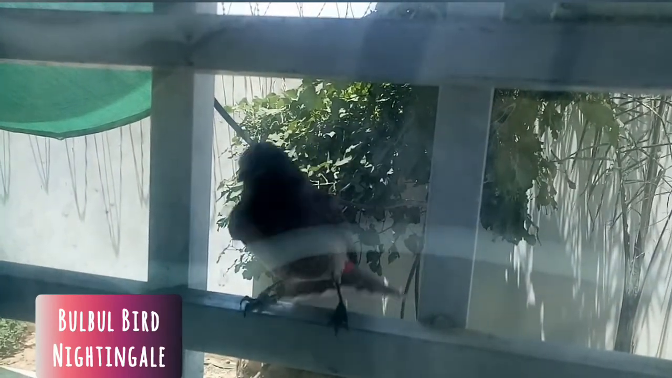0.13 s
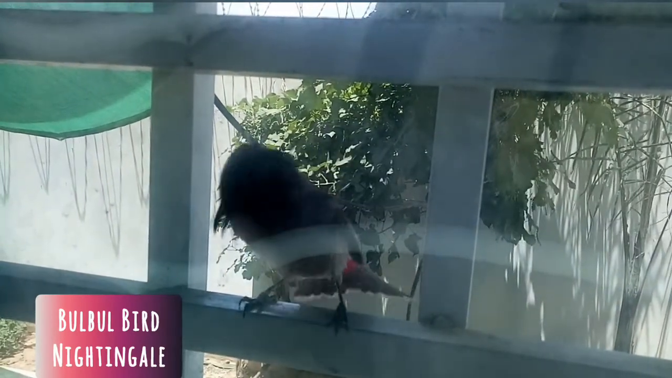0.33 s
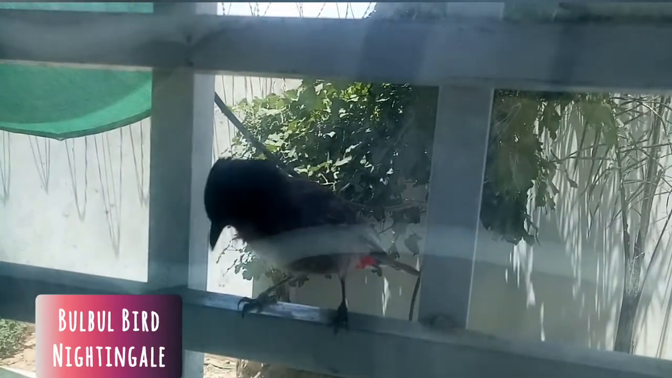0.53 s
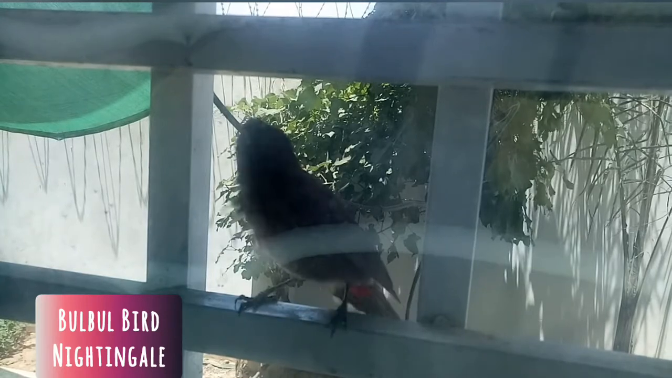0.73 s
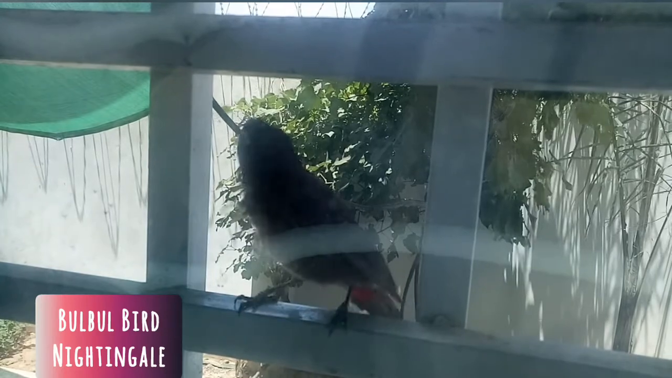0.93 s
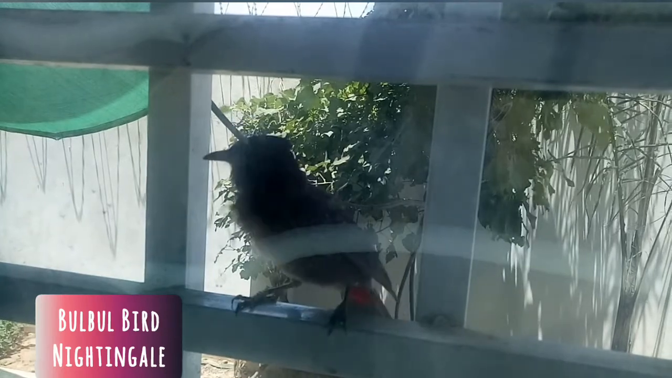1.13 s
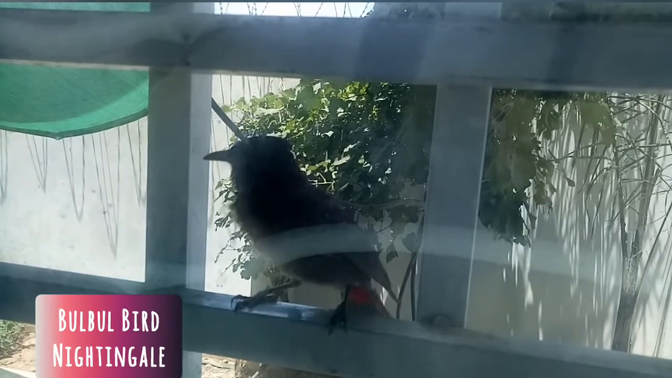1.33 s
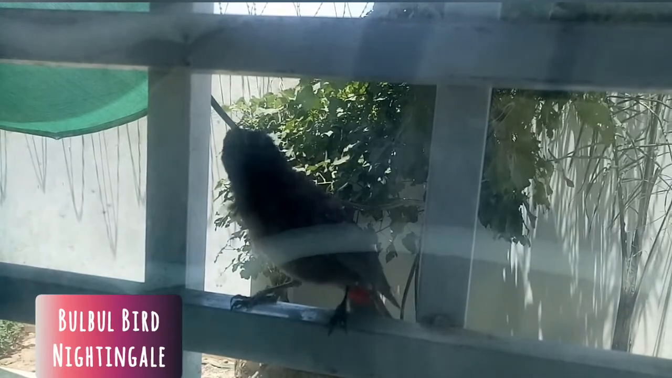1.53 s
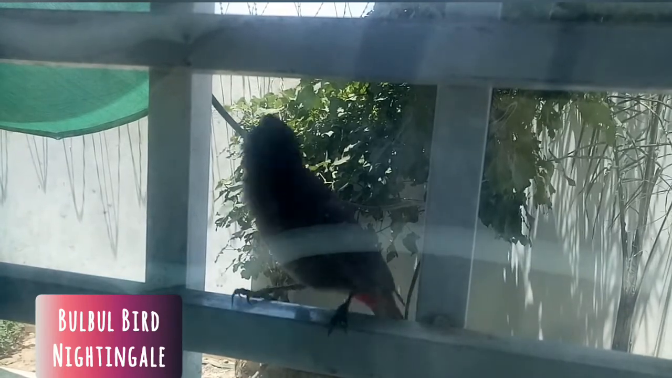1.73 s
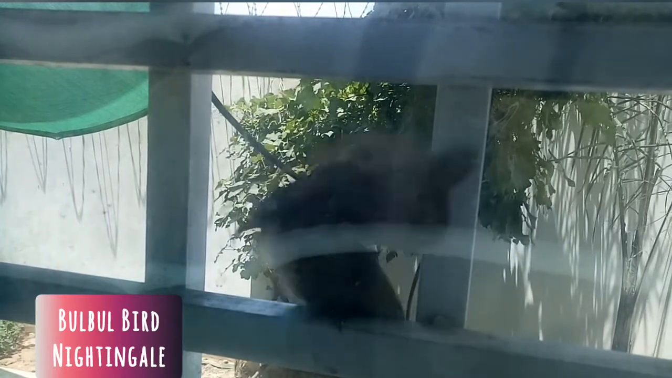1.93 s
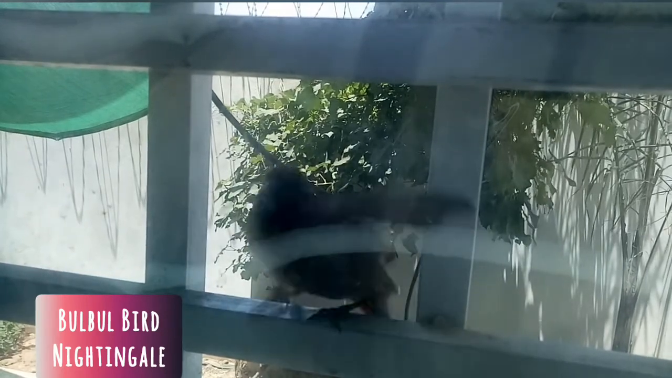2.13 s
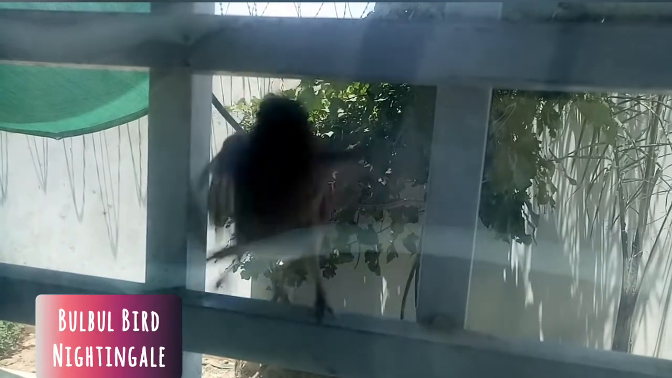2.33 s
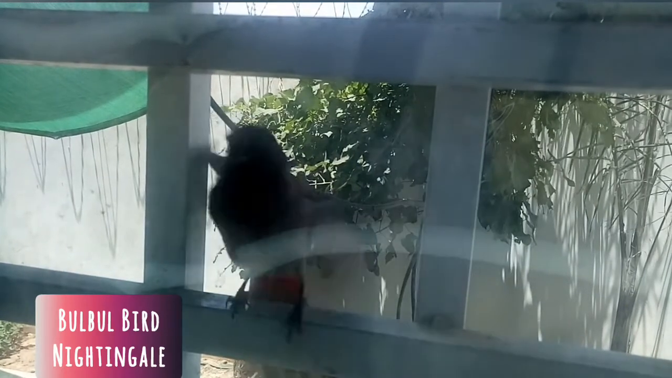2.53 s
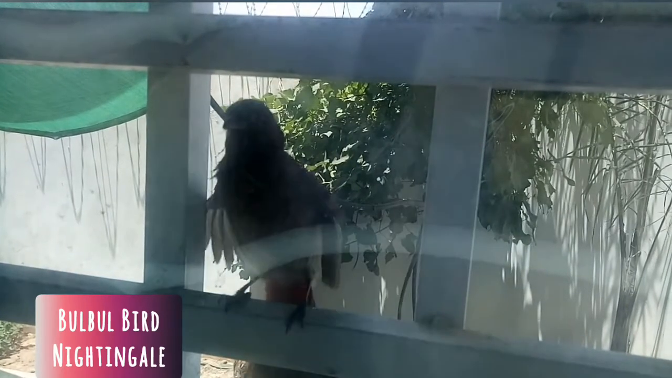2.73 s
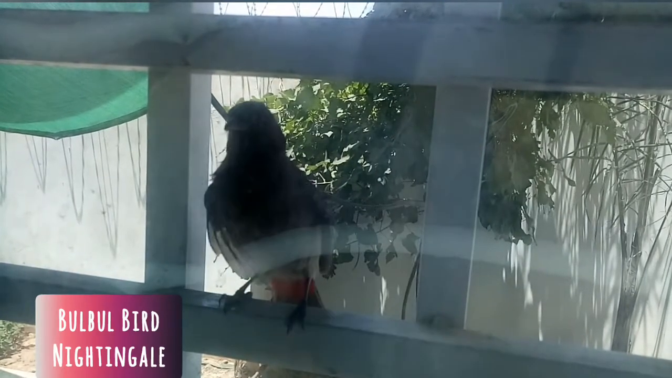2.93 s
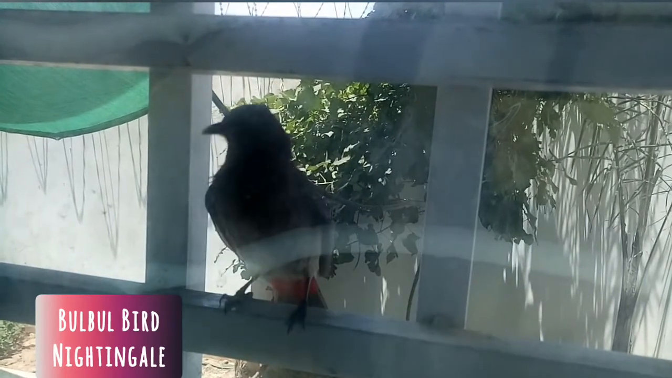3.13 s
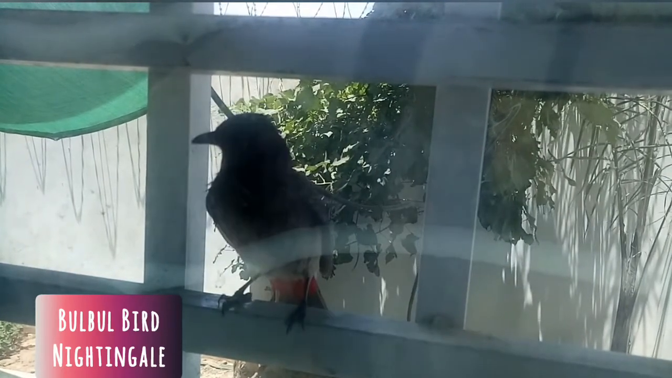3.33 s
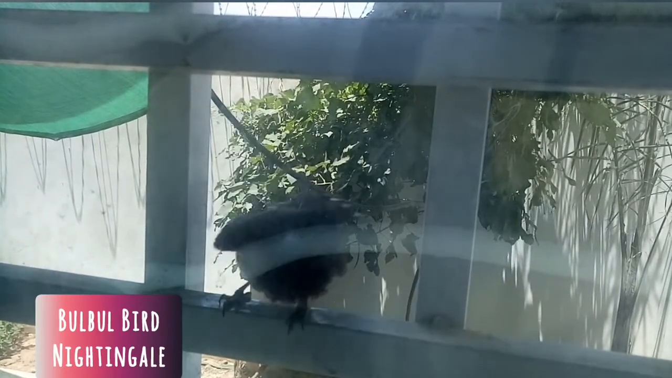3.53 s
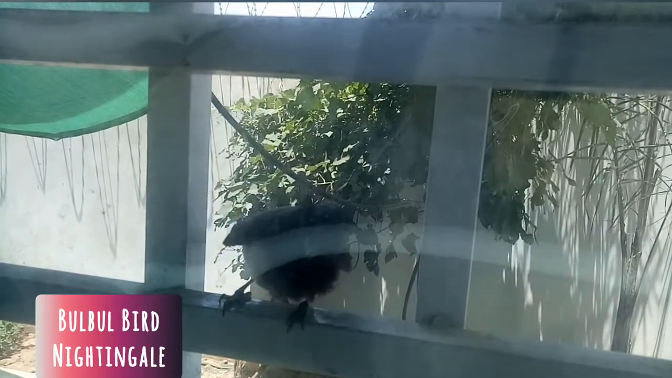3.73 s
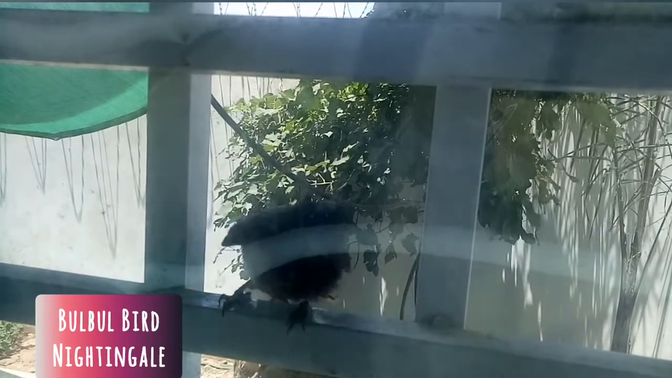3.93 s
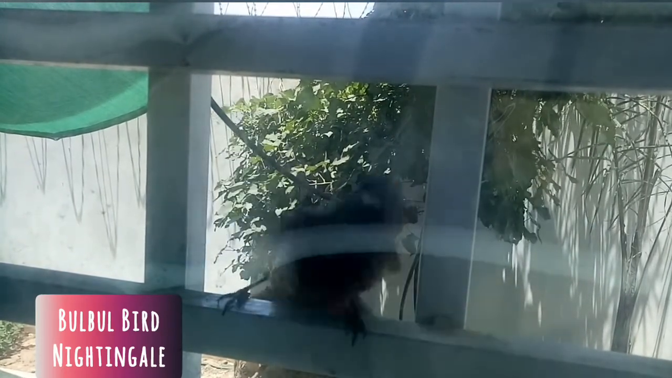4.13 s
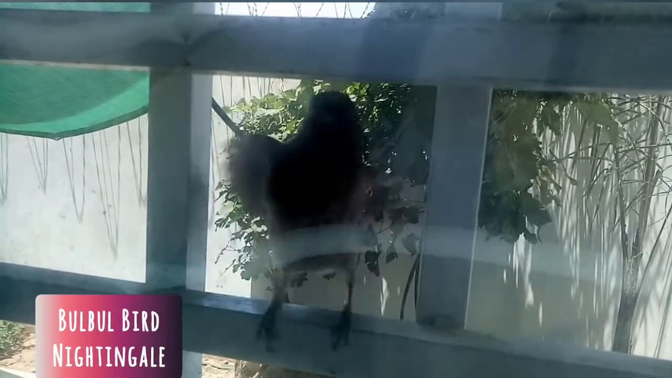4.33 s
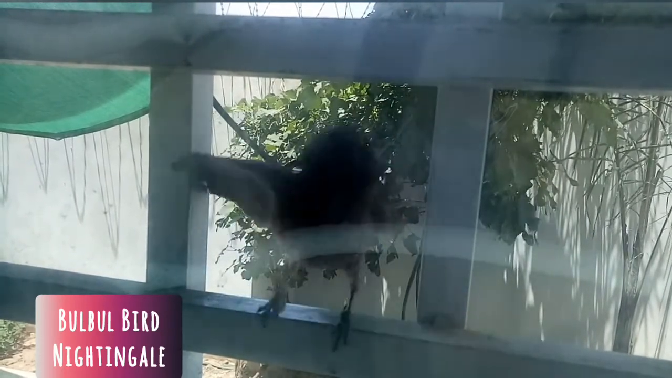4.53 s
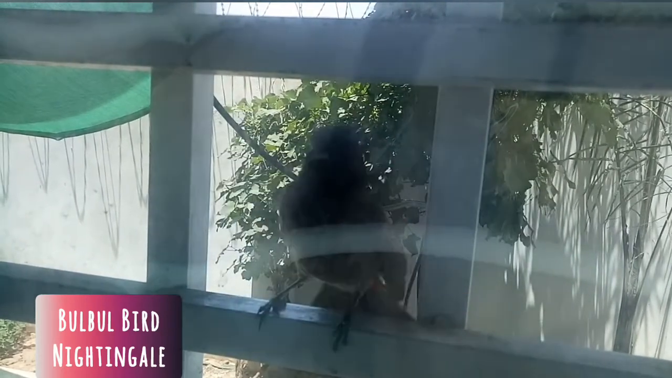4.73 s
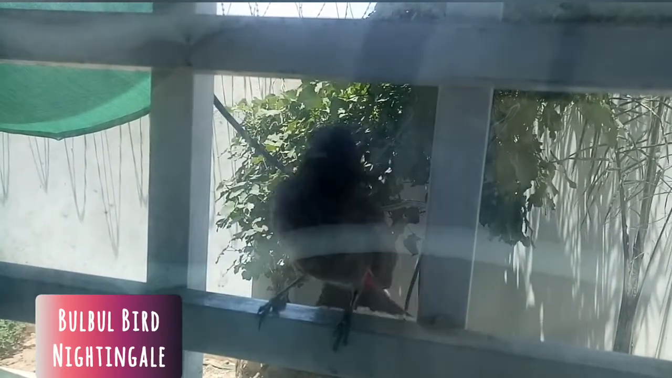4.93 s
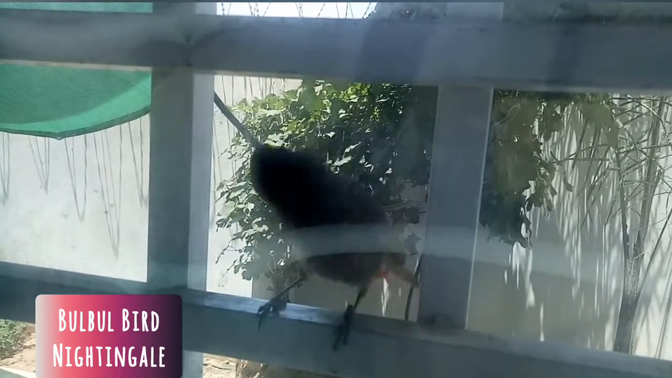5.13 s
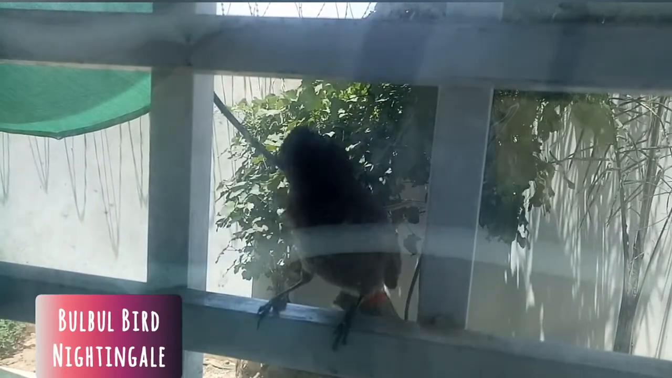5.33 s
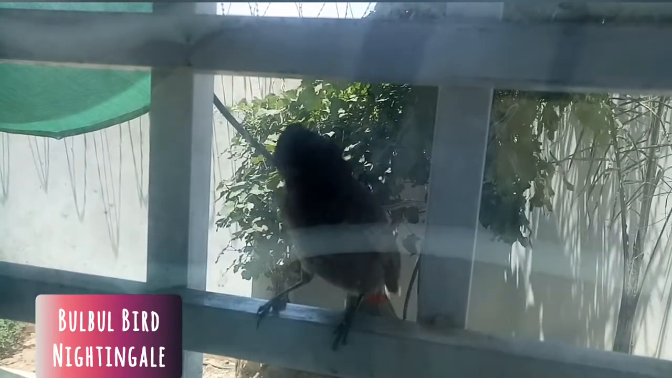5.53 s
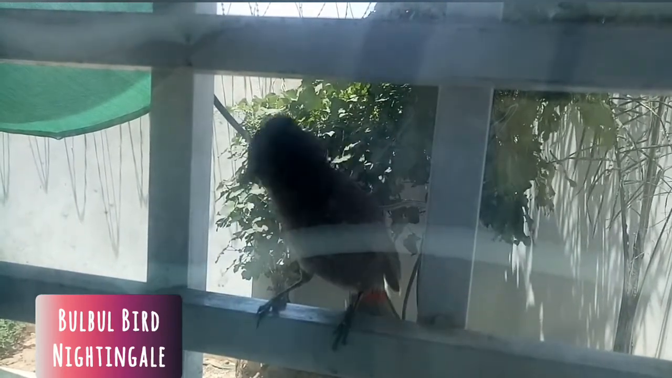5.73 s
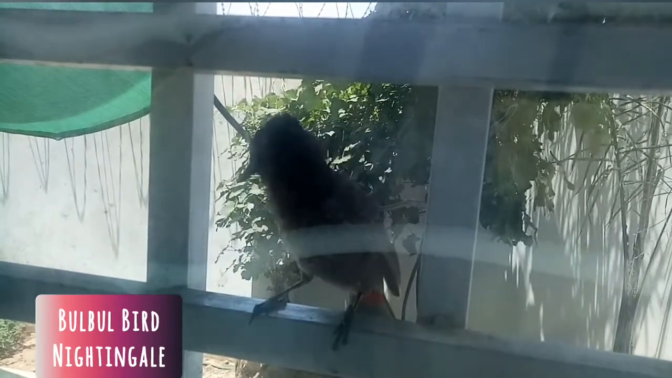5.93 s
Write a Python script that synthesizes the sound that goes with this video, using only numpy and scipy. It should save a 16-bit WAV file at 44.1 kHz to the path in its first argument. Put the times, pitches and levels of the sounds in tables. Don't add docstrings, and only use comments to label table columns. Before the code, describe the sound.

Close to a window indoors: yard birds chip, buzz and whistle over a low, fluttering motor hum. Sharp beak knocks then burst on the glass, crisp and briefly ringing, with a light wing rustle and a short room echo. Later come small claw ticks and another softer set of knocks. The drone slowly rises in pitch, fading in and out beneath slight hiss, the left channel muffled.

```python
import sys
import numpy as np
from scipy import signal
from scipy.fft import rfft, irfft
from scipy.io import wavfile
from scipy.ndimage import uniform_filter1d

SR = 44100
rng = np.random.default_rng(int(sys.argv[2]) if len(sys.argv) > 2 else 0)


def transcribe(signal):
    frames = np.atleast_2d(signal).T
    limited = np.clip(frames, -1, 1)
    pcm = np.round(limited * 32767).astype(np.int16)
    wavfile.write(sys.argv[1], SR, pcm)


def gain_from_db(level_db):
    decades = np.asarray(level_db, float) / 20
    return 10 ** decades


N = 268172

# pitch_hz, level_db, t60_s (seconds to fade by 60 dB)
GLASS_TONES = [(1942, -8, 0.053), (2355, -7.5, 0.077), (2790, -22, 0.0731), (3293, -23.5, 0.016),
               (3987, -6, 0.013), (4118, -22.5, 0.11), (4520, -32, 0.2), (4920, 1.5, 0.012),
               (5800, -24, 0.021), (6100, -37, 0.34), (6315, -35.5, 0.16), (7030, -4.5, 0.072)]


def evened(x):
    return x / np.sqrt(np.mean(x ** 2) + 1e-20)


def smoothed_twice(x, first, second):
    return evened(uniform_filter1d(uniform_filter1d(x, first), second))


def read(points, hz):
    table_hz, value = np.transpose(points)
    return np.interp(np.log(hz + 1), np.log(table_hz + 1), value)


def add(mix, start_s, sound):
    part = mix[round(start_s * SR):][:len(sound)]
    part += sound[:len(part)]


def coloured(x, points):
    size = x.shape[-1]
    gain = gain_from_db(read(points, np.fft.rfftfreq(size, 1 / SR)))
    return irfft(rfft(x) * gain, size)


def causal(points):
    hz = abs(np.fft.fftfreq(2048, 1 / SR))
    log_gain = np.log(gain_from_db(read(points, hz)))
    return np.fft.ifft(np.exp(np.conj(signal.hilbert(log_gain)))).real[:1024]


def ring(modes, chance, spread_db):
    t = np.arange(SR // 3) / SR
    total = np.zeros(len(t))
    for (hz, db, t60), luck in zip(modes, chance):
        total += gain_from_db(db + spread_db * luck - 60 * t / t60) * np.sin(2 * np.pi * hz * t)
    return total


def tails(t60_of, gap_s):
    taps = np.zeros((2, SR))
    start = np.arange(round(gap_s * SR), SR - 20, 20)
    at = start + rng.integers(0, 20, (2, len(start)))
    np.put_along_axis(taps, at, rng.choice([-1., 1.], (2, len(start))), 1)
    hz, t, z = signal.stft(taps, SR, nperseg=256)
    fade_db = -60 * t / read(t60_of, hz)[:, None]
    tail = signal.istft(z * gain_from_db(fade_db), SR, nperseg=256)[1]
    return tail / np.linalg.norm(tail[0])


def arch(length_s, peak_at, start_db, end_db):
    u = np.arange(round(length_s * SR)) / (length_s * SR)
    level_db = np.interp(u, [0, np.clip(peak_at, .02, .98), 1], [start_db, 0, end_db])
    return u, signal.windows.tukey(len(u), .15) * gain_from_db(level_db)


def peck(start_s, db, thud_db, bright_hz, breadth):
    # pitch_hz, level_db (per Hz)
    crack_colour = [(150, -23.5), (500, -0.5), (1200, 0), (2300, -6), (4000, -4.5), (5200, -8.5),
                    (6500, -20), (8000, -44.5), (15000, -63)]
    # pitch_hz, level_db, t60_s
    bending = [(109.14, -21.5, 0.15), (269, 0, 0.055), (369.5, 2.5, 0.029), (538.6, 2, 0.022)]
    noise = rng.standard_normal(1024)
    chance = rng.standard_normal((2, 30))
    t = np.arange(1024) / SR
    contact = (1 - np.exp(-t / .002)) * np.exp(-t / .0028)

    breadth = max(breadth, 1.05)
    bump = [(bright_hz / breadth ** 2, -30), (bright_hz / breadth, -9), (bright_hz, 0), (bright_hz * breadth, -9)]
    colour = np.convolve(causal(crack_colour), causal(bump))[:1024]
    crack = np.convolve(noise * contact, colour)
    crack = gain_from_db(db + 9.5) * crack / abs(crack).max()

    blow = colour * np.linalg.norm(crack) / np.linalg.norm(colour)
    glass = np.convolve(blow, ring(GLASS_TONES, chance[0], spread_db=2.0))

    high_pass = signal.butter(N=2, Wn=85, btype="high", fs=SR)
    thud = -signal.lfilter(*high_pass, ring(bending, chance[1], spread_db=2.5))
    thud = np.roll(thud / abs(thud).max(), 25)
    thud[:1024] -= .5 * np.exp(-((t - .0017) / 0.0003) ** 2)
    thud = gain_from_db(db + thud_db + 11) * thud

    direct, spread = np.zeros((2, SR // 2))
    for part in (crack, gain_from_db(-28.0) * glass, thud):
        add(direct, 0, part)
    add(spread, 0, blow)
    add(spread, 0, gain_from_db(3.5) * thud)
    return start_s - .0015, direct, spread


def beak():
    # start_s, level_db
    clicks = [
        (2.2654, -52),
        (2.3363, -80),
        (2.379, -79),
        (2.4195, -67),
        (4.2483, -66),
    ]
    # pitch_hz, level_db (per Hz)
    click_colour = [(6500, -42), (8000, -1), (13500, -5), (14800, -31.5)]
    out = np.zeros(N)
    t = np.arange(1024) / SR
    swell = (1 - np.exp(-t / .001)) * np.exp(-t / .0044)
    for start_s, db in clicks:
        tick = evened(coloured(rng.standard_normal(1024), click_colour)) * swell
        add(out, start_s - .0015, gain_from_db(db) * tick)
    return out


def claws():
    # start_s, level_db
    scrapes = [
        (3.5622, -44),
        (4.0558, -51.5),
        (4.4414, -58),
    ]
    # pitch_hz, level_db, t60_s
    frame_tones = [
        [(650, -13, .008), (1250, 0, .012), (1600, -2, .008), (1950, 3, .012), (2400, 1, .008), (3100, 0, .006),
         (4750, 5, .014)],
        [(2550, -4, .022), (3200, -1, .022), (3600, -4, .012), (4150, 3, .018), (4800, 8, .015), (5400, 6, .01)],
        [(1300, -3, .015), (1750, -2, .015), (2150, -3, .015), (4100, 5, .02)],
    ]
    out = np.zeros(N)
    for (start_s, db), modes in zip(scrapes, frame_tones):
        tap = np.convolve(np.hanning(14), ring(modes, np.zeros(len(modes)), spread_db=0))
        tap /= abs(tap).max()
        for late_s, slip_db in ((0, -2), (.0031, 3), (.0074, -8.5)):
            add(out, start_s - .002 + late_s, gain_from_db(db + 7.5 + slip_db) * tap)
    return out


def wings():
    # start_s, length_s, level_db (loudest)
    brushes = [
        (2.34, .05, -67),
        (2.385, 0.044, -60.5),
        (4.332, 0.116, -69),
    ]
    # pitch_hz, level_db
    feather_colour = [(300, -8), (1000, 2.5), (3000, -7.5), (6000, 13.5), (9000, -15), (13000, -8.5),
                      (14500, -9.5), (16000, -24)]
    out = np.zeros(N)
    for start_s, length_s, db in brushes:
        gain = arch(length_s, .6, -11.5, -8)[1]
        noise, strokes = rng.standard_normal((2, SR // 4))
        strokes = gain_from_db(3 * evened(uniform_filter1d(strokes, 150)))
        rustle = coloured(noise, feather_colour) * strokes
        add(out, start_s, rustle[:len(gain)] * gain_from_db(db) * gain)
    return out


def room_echo(send):
    # pitch_hz, t60_s
    echo_times = [(100, 0.51), (300, 0.52), (600, 0.48), (1200, 0.36), (3000, 0.54), (4700, 0.56),
                  (6500, 0.35), (10000, 0.44)]
    left, right = signal.fftconvolve(send[None], tails(echo_times, 0.0043), axes=1)[:, :N]
    shared_bass = coloured(right - left, [(350, 0), (900, -30)])
    return np.array([left + shared_bass, right])


def through_pane(x):
    modes = [(hz, db / 3, min(t60, .04)) for hz, db, t60 in GLASS_TONES]
    glass = ring(modes, np.zeros(len(modes)), spread_db=0)
    return x + gain_from_db(-39) * signal.fftconvolve(x, glass[None], axes=1)[:, :N]


def yard_birds():
    # start_s, length_s, level_db (loudest), first_pitch_hz, last_pitch_hz
    whistles = [(.171, 0.11, -69, 3890, 3851), (.381, 0.14, -69.5, 2350, 2357),
                (.541, 0.13, -60.5, 2000, 2010), (.501, 0.11, -63.5, 2710, 2670),
                (1.021, 0.19, -56.5, 2361, 2170), (1.321, 0.2, -57.5, 2230, 2199),
                (1.311, .12, -67, 1833, 1851), (1.511, 0.2, -58.5, 2187, 2171),
                (1.781, .31, -72.5, 4601, 4580), (2.035, .12, -70, 4100, 4050),
                (3.111, 0.11, -71.5, 4945, 4931), (3.401, 0.17, -73.5, 3940, 4050),
                (3.575, .21, -63, 3366, 3245), (3.841, .2, -79.5, 4401, 4390),
                (4.501, 0.19, -65, 5421, 5260), (5.211, .05, -72, 1290, 1301),
                (5.19, 0.21, -74.5, 4376, 4383), (5.39, 0.25, -78.5, 5290, 5290),
                (5.73, .14, -80, 4380, 4380), (6.0, .2, -65, 4438, 4550)]
    chips = [
        (.49, 0.082, -52, 3282, 3384),
        (.995, .07, -44.5, 4020, 3927),
        (1.485, 0.048, -43, 2266, 2184),
        (4.492, 0.018, -40.5, 5510, 5420),
    ]
    churrs = [(.18, 0.42, -71.5, 4420, 4520), (.4, 0.21, -68, 3800, 3420), (.49, 0.13, -68, 3164, 3250),
              (.5, 0.085, -73, 2170, 1943), (.88, .32, -70.5, 4350, 4370), (.94, 0.24, -67, 3050, 3245),
              (1.03, .17, -64, 3660, 3530), (1.1, 0.16, -73, 2800, 2605), (1.3, .2, -69.5, 4420, 4310),
              (1.32, .23, -56, 3814, 3240), (1.41, 0.16, -60.5, 2690, 2790),
              (1.54, 0.141, -61.5, 3540, 3660), (3.15, .19, -67, 4670, 4537), (3.35, 0.25, -67, 4552, 4620),
              (3.38, 0.096, -67.5, 4900, 5220), (3.63, 0.14, -67.5, 3766, 3810),
              (4.39, 0.19, -64, 4100, 4050), (5.34, .13, -76.5, 4590, 4450), (2.5, .11, -71, 4010, 3900),
              (2.84, 0.19, -73.5, 4510, 4458)]
    sweeps = [
        (1.395, .095, -50.5, 3560, 2187),
    ]
    shrieks = [
        (.935, 0.2, -56, 4544, 3480),
        (1.33, 0.11, -64, 4020, 3650),
    ]
    # loudest place (0-1), start_db, end_db, buzz_hz
    kinds = [(whistles, (0.18, -8, -20, 59.5)), (chips, (0.06, -4, -17.5, 87)),
             (churrs, (0.73, -2, -29.5, 167.5)), (sweeps, (0, -14, -5, 121)), (shrieks, (.3, -9, -15, 600))]
    flutter_db = 3.5
    out = np.zeros(N)
    for notes, (*shape, buzz_hz) in kinds:
        for start_s, length_s, db, first_hz, last_hz in notes:
            u, gain = arch(length_s, *shape)
            buzz = smoothed_twice(rng.standard_normal(SR // 2), 50, 50)[:len(u)]
            hz = first_hz + (last_hz - first_hz) * u + buzz_hz * buzz
            flutter = smoothed_twice(rng.standard_normal(SR // 2), 700, 500)[:len(u)]
            tone = np.sin(2 * np.pi * np.cumsum(hz) / SR)
            add(out, start_s, gain_from_db(db + flutter_db * flutter - 1) * gain * tone)
    leaves = tails([(1000, 0.087), (6000, 0.086)], 0.000989)
    walls = tails([(1500, 0.49), (6000, 0.25)], .02)
    blurred = signal.fftconvolve(out[None], .62 * leaves + .3 * walls, axes=1)[:, :N]
    return blurred + 0.6 * out


def engine_tones(t, cycle_hz, fifth_db, fourth_db, fade_db):
    turn = 2 * np.pi * np.cumsum(cycle_hz) / SR
    waver = sum(np.sin(2 * np.pi * (f * t + rng.random())) for f in np.geomspace(1.1, 6.3, num=9))
    waver = evened(waver)
    room_fade_db = .6 * fade_db
    tones = [(4 * turn, fourth_db + .25 * fade_db),
             (5 * turn, fifth_db + fade_db),
             (2 * np.pi * 158 * t, fourth_db + room_fade_db - 4 + 4 * waver)]
    total = np.zeros(N)
    for angle, db in tones:
        total += np.sqrt(2) * gain_from_db(db) * np.sin(angle + 2 * np.pi * rng.random())
    hum_db = -71 + room_fade_db + 2 * waver[::-1]
    return total + gain_from_db(hum_db) * np.sin(2 * np.pi * 74.8 * t)


def engine_noise(t, load_db):
    # pitch_hz, level_db (per Hz)
    rumble_colour = [(12, -53), (20, -23.5), (70, -9), (113, -1.5), (139, -3.5), (159, -7.5), (199, -11),
                     (232, -18), (536, -39), (1200, -51.5), (1560, -80.5), (2640, -120)]
    boom_colour = [(200, -27), (290, 6), (340, 3), (450, -16), (700, -46.5)]
    a, b, c, d = rng.standard_normal((4, N))
    rumble = evened(coloured(np.array([a + 0.1 * b, a - 0.12 * b]), rumble_colour))
    boom = evened(coloured(np.array([c + 0.96 * d, c - 0.4026 * d]), boom_colour))
    swell_db = 9 * np.exp(-((t - 4.15) / .6) ** 2)
    return rumble * gain_from_db(0.54 * load_db - 62), boom * gain_from_db(0.296 * load_db - 71.5 + swell_db)


def engine():
    # start_s, cycle_rate_hz, fifth_level_db, fourth_level_db (tones at 5 and 4 times the rate)
    running = [(0.0, 27.27, -60, -74), (.1, 27.3, -51.5, -52), (.24, 26.96, -69, -58.5),
               (.45, 25.86, -45.5, -63.5), (.78, 26.01, -51, -58.5), (.92, 27, -48.5, -58.5),
               (1.4, 27.2, -47.5, -57.5), (1.78, 27.26, -53, -65), (1.88, 27.3, -68.5, -88),
               (2.0, 27.3, -53, -67.5), (2.33, 27.18, -54.5, -47.5), (2.56, 27.6, -74.5, -73),
               (3.05, 28.46, -57.5, -62.5), (3.13, 28.8, -80.5, -88), (3.52, 29.22, -45.5, -62),
               (3.8, 29.16, -48.5, -56.5), (5.15, 30.9, -56.5, -66.5), (6.08, 32, -62, -66.5)]
    # middle_s, depth_db, half_width_s
    fades = [(0.508, -11, 0.063), (0.809, -10, 0.052), (1.0, -7.5, 0.14), (1.338, -11, 0.042),
             (2.76, -24, 0.11), (3.73, -10, .06), (4.03, -15.5, .06), (4.2, -25, 0.062),
             (4.45, -5.5, 0.046), (4.621, -4, 0.048), (4.76, -17, 0.083), (4.939, -20.5, 0.063),
             (5.05, -9, .07), (5.23, -19, .1), (5.44, -30.5, 0.17), (5.65, -25, 0.084), (5.88, -23.5, .1)]
    t = np.arange(N) / SR
    s, *columns = np.transpose(running)
    cycle_hz, fifth_db, fourth_db = (np.interp(t, s, column) for column in columns)
    fade_db = sum(db * np.maximum(1 - abs(t - at) / half, 0) for at, db, half in fades)
    tones = engine_tones(t, cycle_hz, fifth_db, fourth_db, fade_db)
    loudest_db = np.maximum(fifth_db + 0.39 * fade_db, fourth_db + 6)
    rumble, boom = engine_noise(t, uniform_filter1d(loudest_db, size=4410) + 48.5)
    late = np.array([np.roll(tones, 14), tones])
    left_lead_db = 5 - 0.53 * t
    pan_db = np.array([[.5], [-.5]]) * left_lead_db
    return (late + rumble) * gain_from_db(pan_db) + boom


def slipped(x, slip_s, edge_s):
    at = np.arange(N)
    blocks = np.arange(N // 882 + 2)
    slips = (-1.) ** blocks * rng.uniform(.45, .85, len(blocks))
    slip = slip_s * SR * slips[(at + 860) // 882]
    slip = uniform_filter1d(slip, max(round(edge_s * SR), 1))
    return np.array([np.interp(at + slip, at, channel) for channel in x])


def covered_port(x):
    # pitch_hz, level_db
    cover = [(60, 4), (170, 4), (300, 3), (500, 0), (800, -3), (1350, -3.5), (2270, -13), (3800, -31),
             (6800, -33), (8800, -8), (12000, -4)]
    return gain_from_db(-1.5) * np.roll(signal.oaconvolve(x, causal(cover))[:N], shift=5)


def port_hiss():
    # pitch_hz, level_db (per Hz)
    hiss_colour = [(30, -19.5), (100, -4), (200, -7.5), (300, -14.5), (600, -22.5), (1000, -26.5),
                   (2000, -30.5), (4400, -32.5), (5500, -40.5), (7000, -44), (10000, -46), (14500, -46.5)]
    hiss = coloured(rng.standard_normal((2, N)), hiss_colour)
    high = np.std(coloured(hiss[0], [(500, -59), (650, 1)]))
    return gain_from_db(-78.5 + 3) * hiss / high


def scene():
    # start_s, blow_db, thud_db (against the blow), brightest_hz, breadth (a ratio of pitches)
    strikes = [(2.2664, -22.5, -10.5, 3515, 2.75), (2.2842, -30, -9.5, 3260, 12),
               (2.3363, -44, -12, 4090, 1.08), (2.3806, -46.5, -16, 3450, 2.2),
               (2.4113, -36, -17.5, 3600, 3.7), (2.418, -38, -15, 3307, 3.2), (2.626, -22, -9.5, 4920, 15),
               (2.6454, -39.5, -15, 4540, 2.26), (4.2486, -28, -10, 4460, 3.7),
               (4.2611, -37.5, -10.5, 4100, 6.6), (4.2827, -50.5, -2, 3850, 1.8),
               (4.4959, -55, -10.5, 5170, 1.21)]
    rustle, scrapes = wings(), claws()
    near = rustle + scrapes + beak()
    send = rustle + gain_from_db(2.5) * scrapes
    for strike in strikes:
        start_s, direct, spread = peck(*strike)
        add(near, start_s, direct)
        add(send, start_s, spread)
    left, right = near + through_pane(gain_from_db(-11) * room_echo(send) + yard_birds())
    ports = np.array([covered_port(left), right])
    return ports + slipped(engine(), slip_s=0.00041, edge_s=.0006)


def low_pass(x):
    return signal.sosfilt(signal.butter(12, 15480, fs=SR, output="sos"), x)


def record(dry):
    return low_pass(dry + port_hiss())


dry = scene()
out = record(dry)
transcribe(out)
```